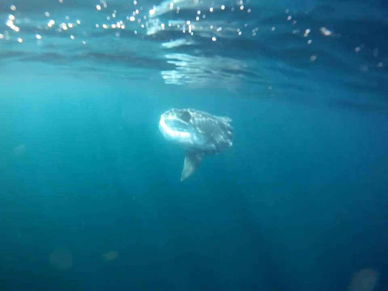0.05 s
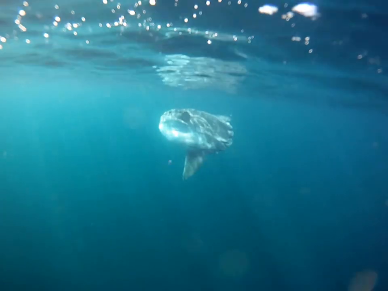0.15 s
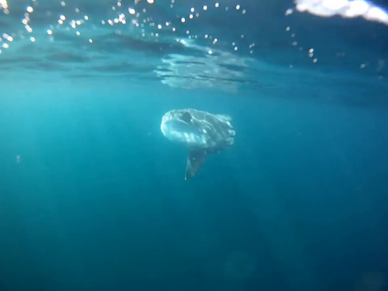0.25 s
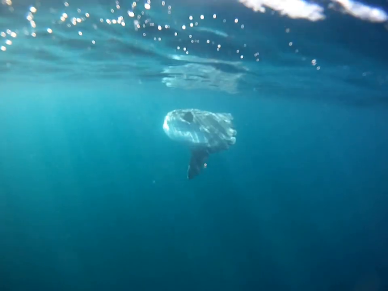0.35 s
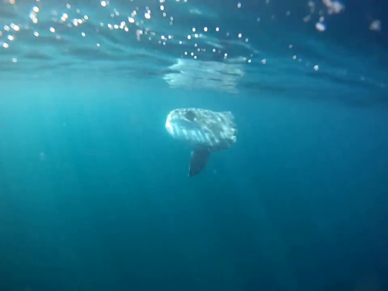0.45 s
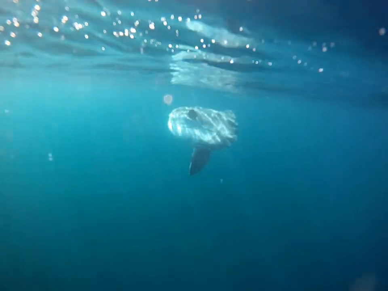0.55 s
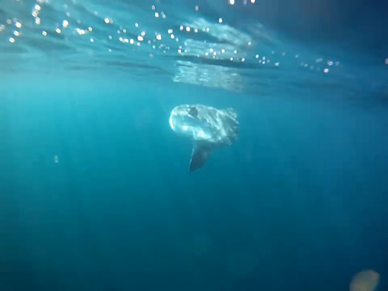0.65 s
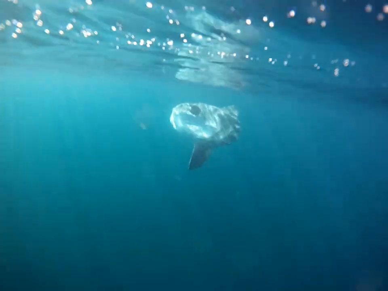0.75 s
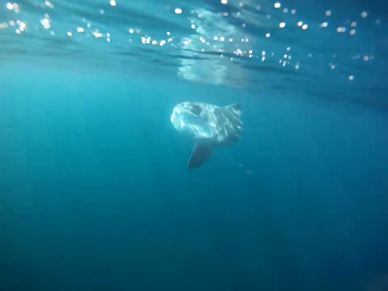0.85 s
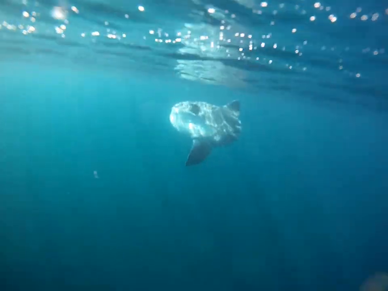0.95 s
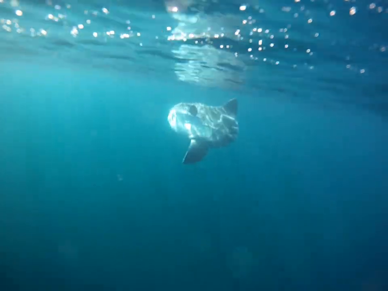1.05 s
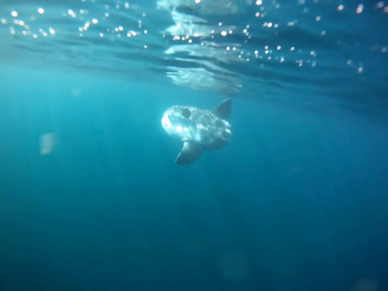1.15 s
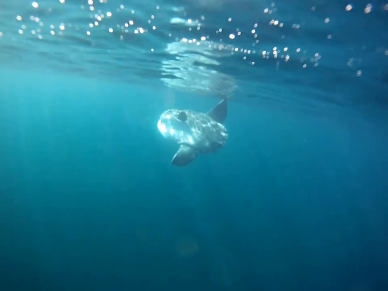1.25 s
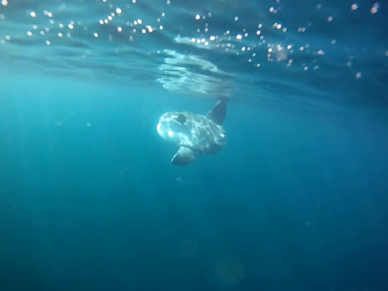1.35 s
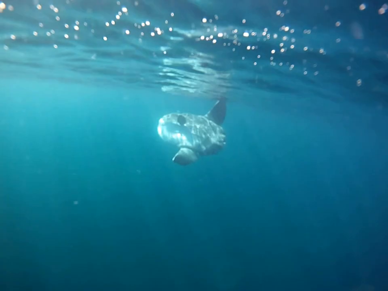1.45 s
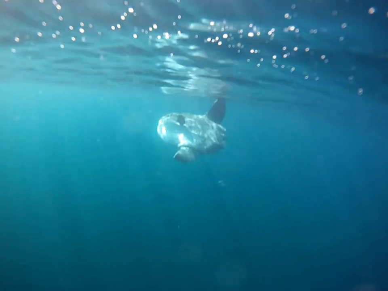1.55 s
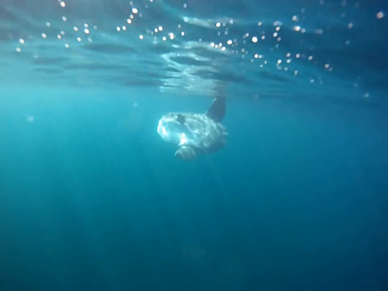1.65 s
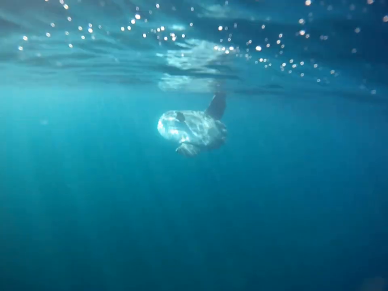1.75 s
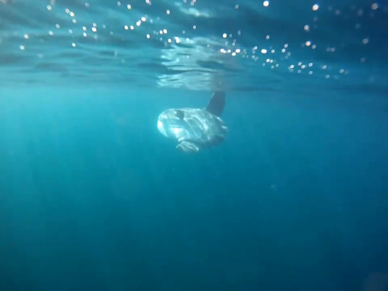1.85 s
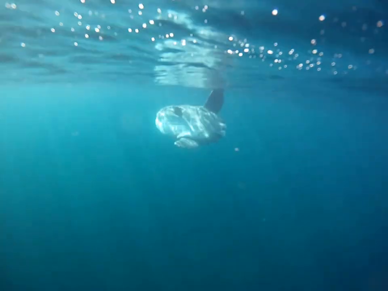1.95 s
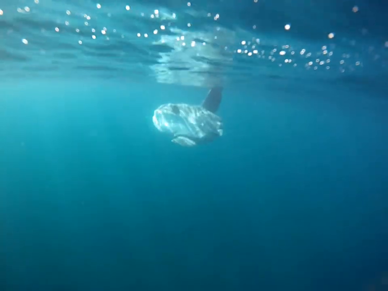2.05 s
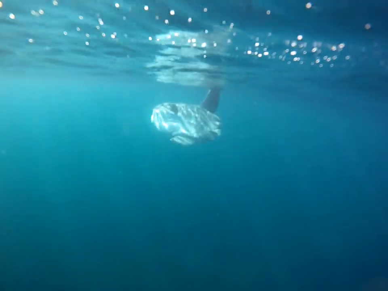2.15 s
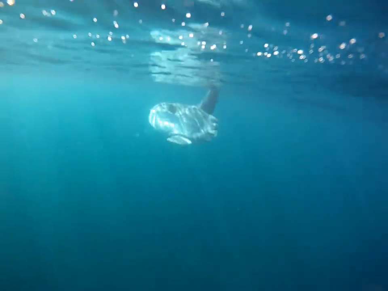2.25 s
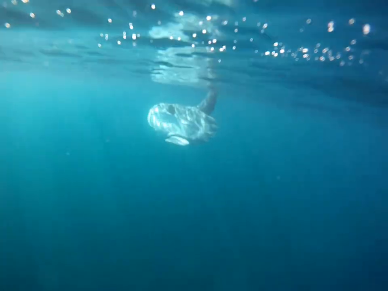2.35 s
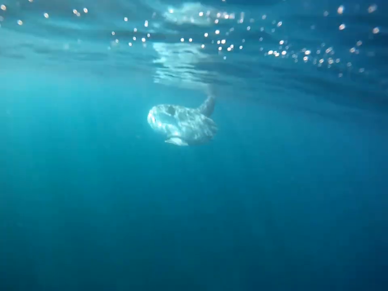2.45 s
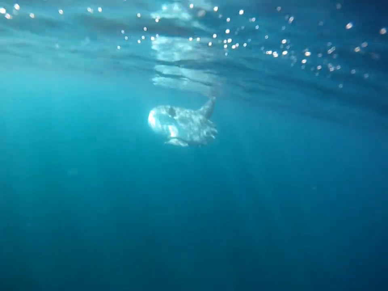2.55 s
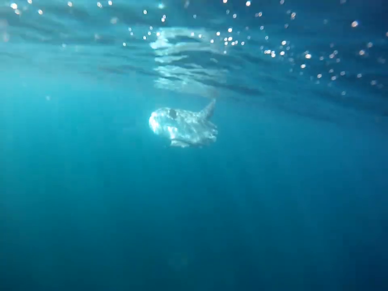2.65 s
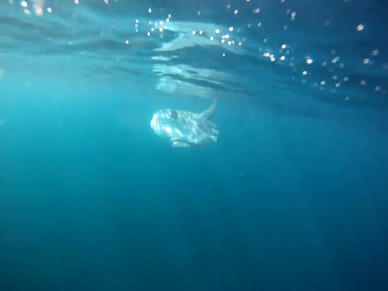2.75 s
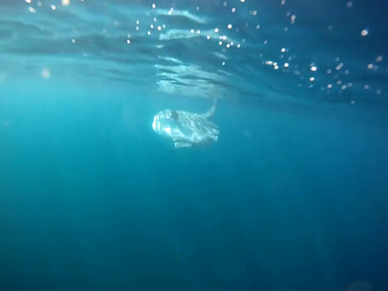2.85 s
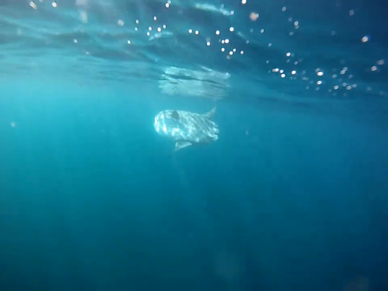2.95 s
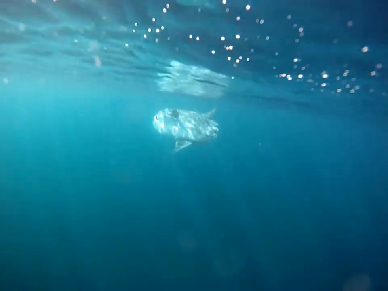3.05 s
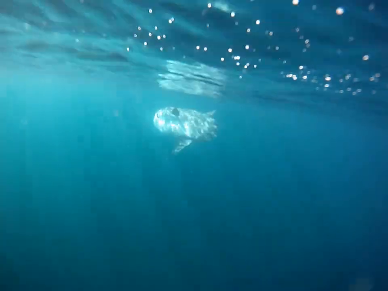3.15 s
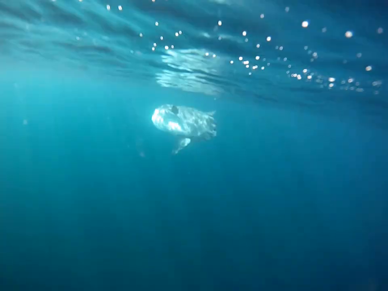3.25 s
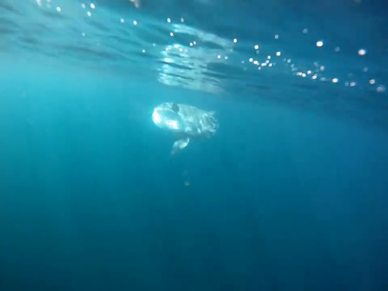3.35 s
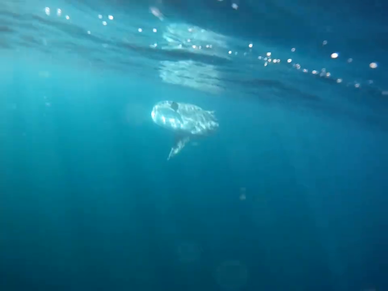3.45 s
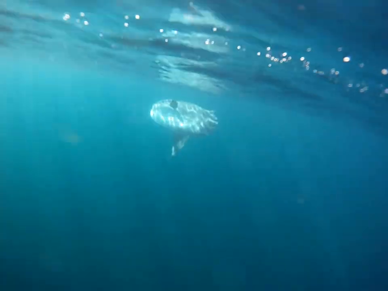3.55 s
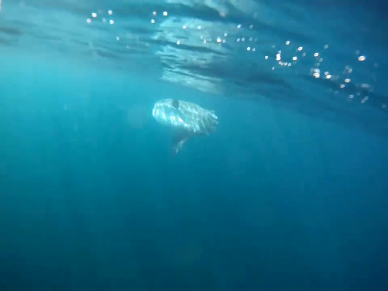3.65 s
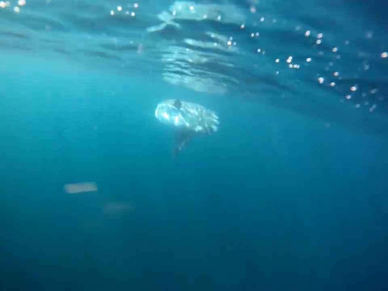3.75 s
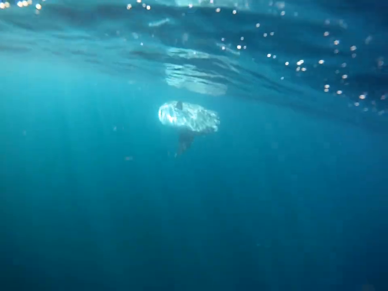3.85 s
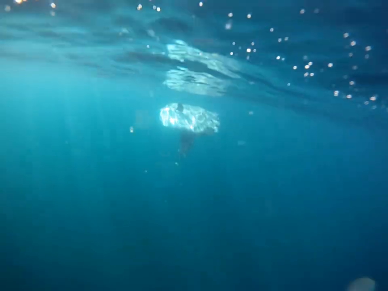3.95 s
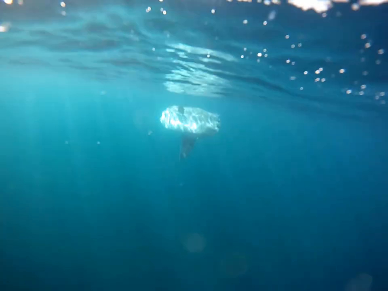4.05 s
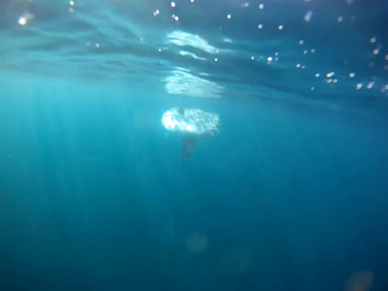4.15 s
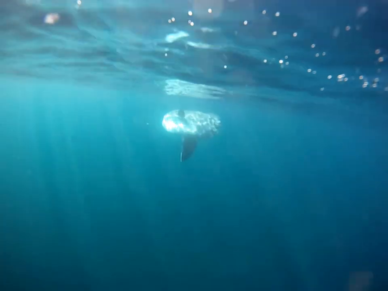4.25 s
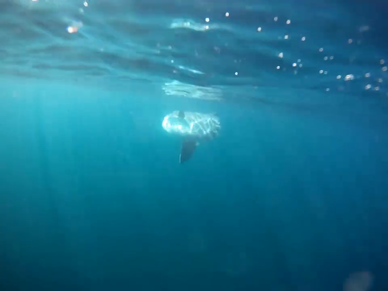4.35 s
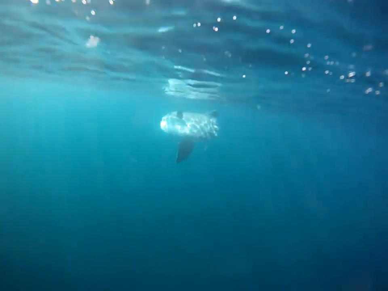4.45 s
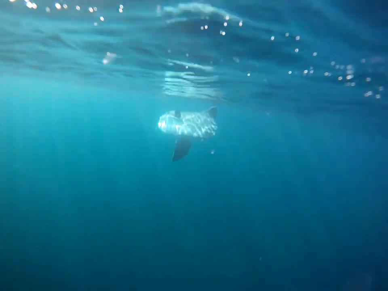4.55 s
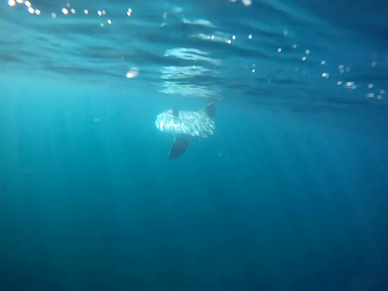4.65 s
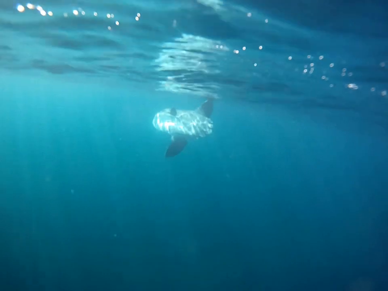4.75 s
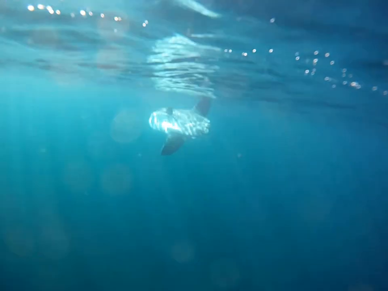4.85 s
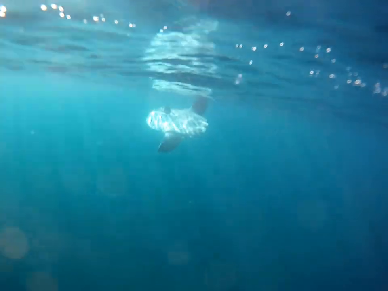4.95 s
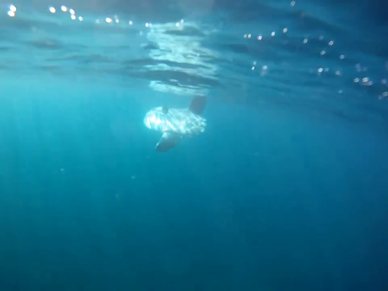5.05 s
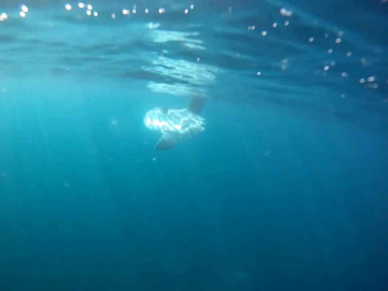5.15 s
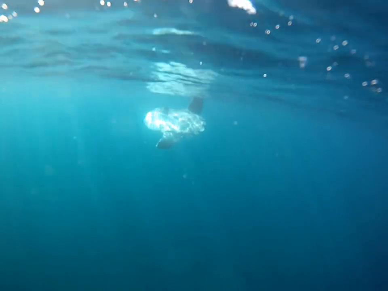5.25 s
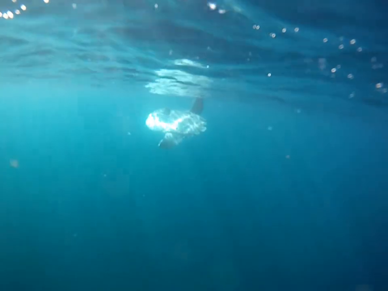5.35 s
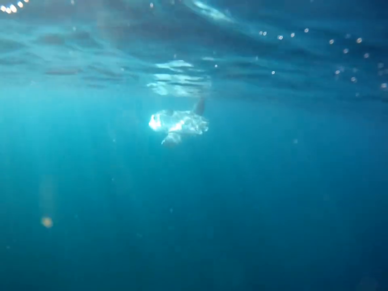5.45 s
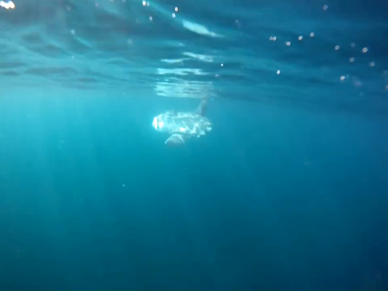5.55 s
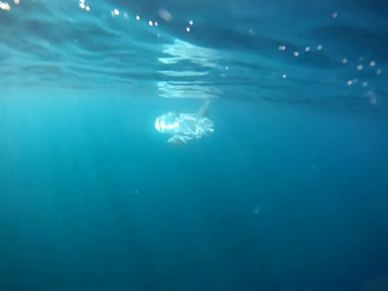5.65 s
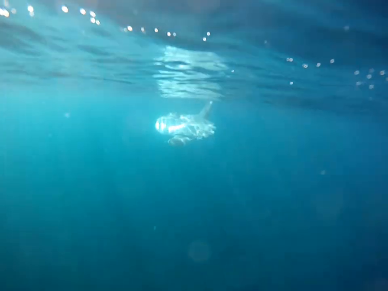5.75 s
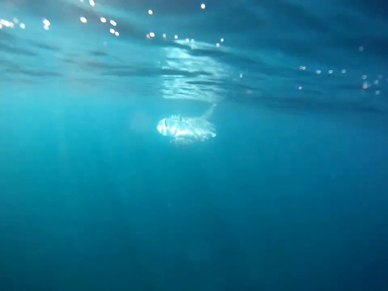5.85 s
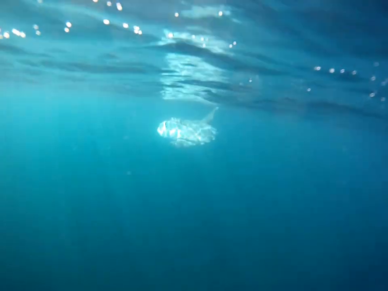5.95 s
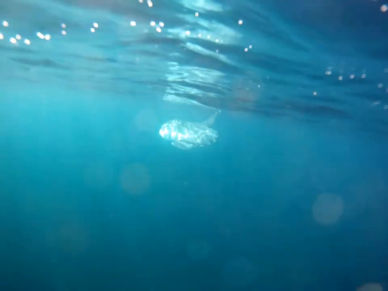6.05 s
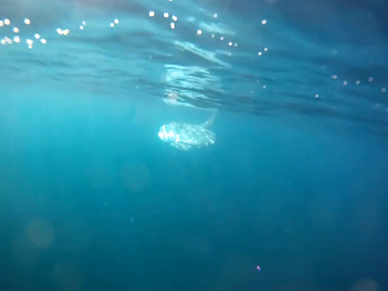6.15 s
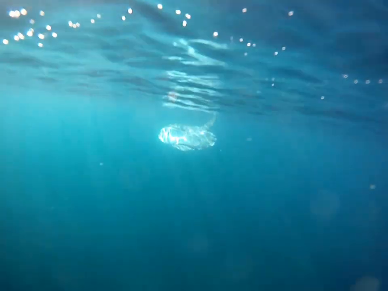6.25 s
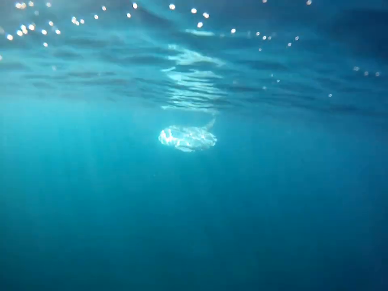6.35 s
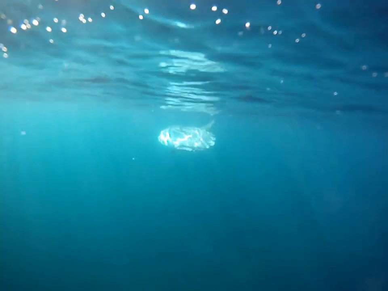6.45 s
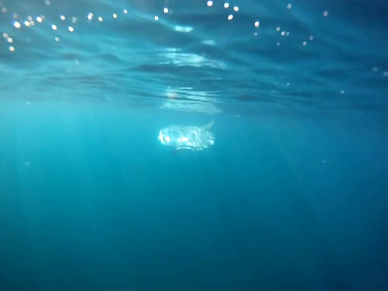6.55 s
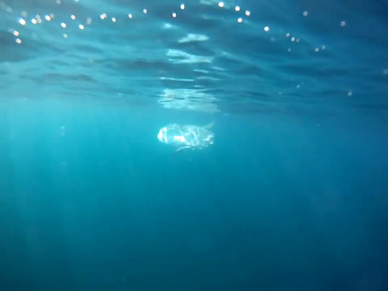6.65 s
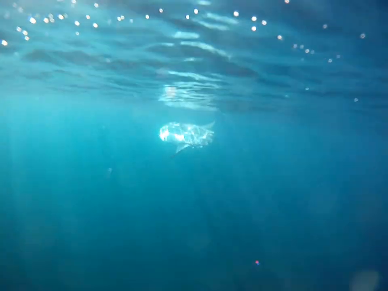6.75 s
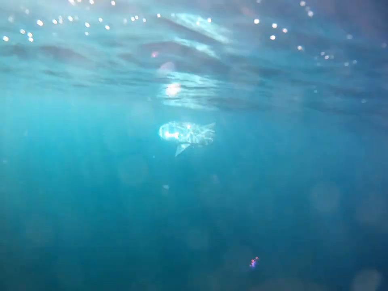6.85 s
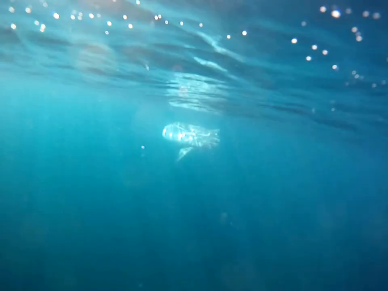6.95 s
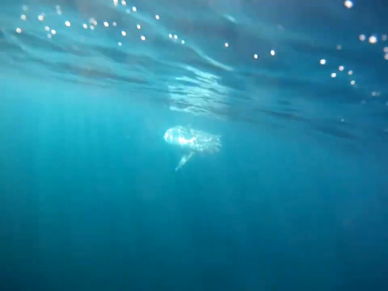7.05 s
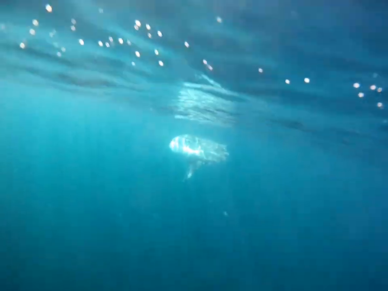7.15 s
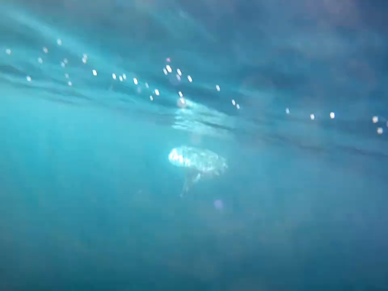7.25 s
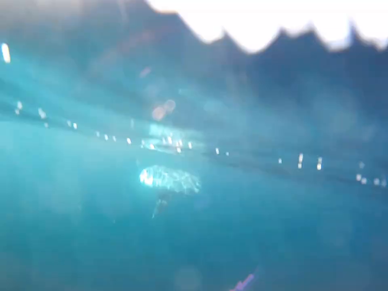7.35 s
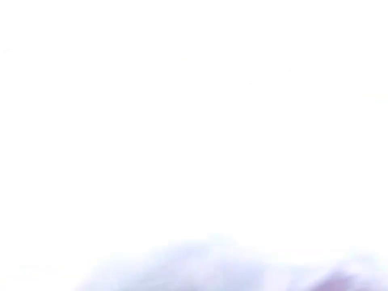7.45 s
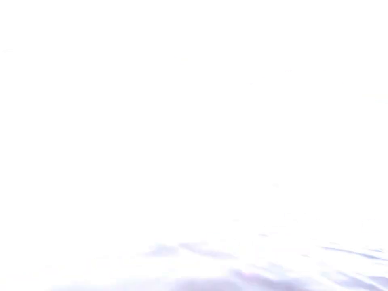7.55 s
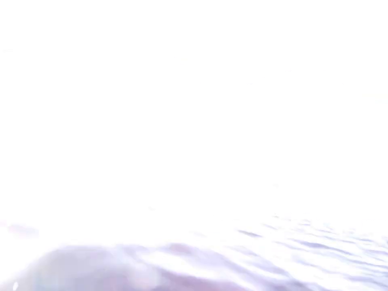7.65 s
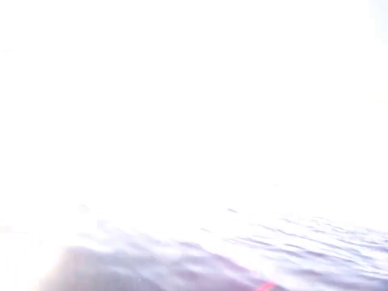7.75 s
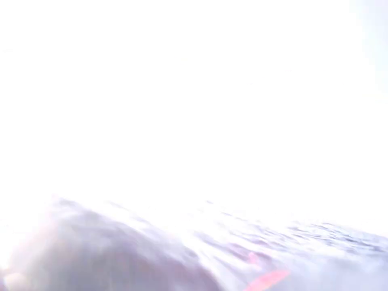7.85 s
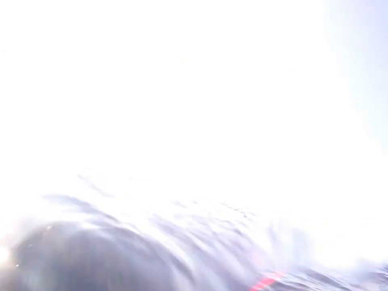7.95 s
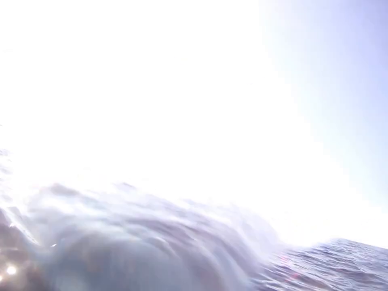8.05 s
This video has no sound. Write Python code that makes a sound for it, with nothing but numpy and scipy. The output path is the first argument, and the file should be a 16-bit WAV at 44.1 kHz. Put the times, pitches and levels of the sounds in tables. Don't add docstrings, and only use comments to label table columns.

```python
import sys
import numpy as np
from scipy import signal
from scipy.fft import rfft, irfft, next_fast_len
from scipy.io import wavfile
from scipy.ndimage import uniform_filter1d

SR = 44100
rng = np.random.default_rng(int(sys.argv[2]) if len(sys.argv) > 2 else 0)


def level_to_linear(level):
    exponent = np.asarray(level, float) / 20
    return 10 ** exponent


def wrap_up_sound(samples):
    columns = np.atleast_2d(samples).T
    tamed = np.clip(columns, -1, 1)
    steps = np.round(tamed * 32767).astype(np.int16)
    wavfile.write(sys.argv[1], SR, steps)


N = 356767


def rms_one(x):
    return x / np.sqrt(np.mean(x ** 2) + 1e-20)


def ramp(start_s, length_s):
    return np.clip((np.arange(N) / SR - start_s) / length_s, 0, 1)


def in_time(rows):
    s, *columns = np.transpose(rows)
    return [np.interp(np.arange(N) / SR, s, column) for column in columns]


def add(track, s, sound):
    i = round(s * SR)
    track[i:i + len(sound)] += sound[:N - i]


def drift(rate_hz):
    r = np.exp(-2 * np.pi * rate_hz * 40 / SR)
    chance = rng.standard_normal(N // 40 + 2002)
    slow = signal.lfilter([1], [1, -2 * r, r * r], chance)[2000:]
    return np.interp(np.arange(N) / 40, np.arange(len(slow)), rms_one(slow))


def resonate(x, hz, width_hz):
    r2 = np.exp(-2 * np.pi * width_hz / SR)
    top = np.array([1, 0, -1]) * (1 - r2) / 2
    return signal.lfilter(top, [1, -(1 + r2) * np.cos(2 * np.pi * hz / SR), r2], x)


def resonate_twice(x, hz, width_hz):
    return resonate(resonate(x, hz, width_hz), hz, width_hz)


def turbulence(modes, patchy_db, lumpy_db, rate_hz):
    white = rng.standard_normal((2, N + SR))
    lumps = drift(6.4 * rate_hz)
    out = 0
    for k, (hz, width_hz, level_db) in enumerate(modes):
        band = resonate_twice(white[k % 2], hz, 1.28 * width_hz)[SR:]
        out = out + level_to_linear(level_db + patchy_db * drift(rate_hz) + lumpy_db * lumps) * band
    return rms_one(out)


# time_s, push_db on hull and case, wash_db along the housing
SWELL = [(0, -46, -58), (.43, -40.5, -56), (.7, -42.5, -57.5), (1.08, -48.5, -59.5), (1.52, -41, -56),
         (2.03, -43, -56.5), (2.39, -48.5, -56.5), (2.8, -42.5, -51), (3.2, -43.5, -56), (3.62, -50, -57.5),
         (3.94, -45.5, -53.5), (4.24, -40.5, -52.5), (4.85, -47.5, -55.5), (5.3, -43, -54.5),
         (5.9, -44.5, -57.5), (6.4, -49, -56.5), (7.01, -43.5, -56.5), (7.16, -46, -55.5)]


def swell():
    push_db, wash_db = in_time(SWELL)
    last_crest = np.exp(-((np.arange(N) / SR - 7.97) / 0.06) ** 2)
    return push_db - 13.1 * ramp(7.45, 0.32) + 11 * last_crest, wash_db


# pitch_hz, width_hz, level_db
SURGE_TONES = [(17.5, 4.7, -1), (30, 6.1, -8), (40, 4, 0.5), (51.2, 17, -5), (63, 4.6, -20)]


def surge(push_db):
    level = level_to_linear(-52 + 1.33 * (push_db + 45)) + level_to_linear(-61)
    return level * turbulence(SURGE_TONES, patchy_db=0.9, lumpy_db=-0.2, rate_hz=1.8)


# pitch_hz, width_hz, level_db
HULL_TONES = [(80.5, 6.9, 0), (98, 12.5, 1.5), (120, 9.3, -1.5), (158.6, 25.6, -4.5), (178.1, 6, -5),
              (203.4, 20.6, -9), (229.6, 29.3, -6), (251.7, 11, -11), (275.3, 13.2, -13),
              (310, 56.4, -17.5), (380, 120, -25.5), (430, 50, -25), (553, 96, -26.5)]


def hull(push_db):
    return level_to_linear(push_db + 2.5) * turbulence(HULL_TONES, patchy_db=2.16, lumpy_db=1.54, rate_hz=6.4)


# pitch_hz, width_hz, level_db
HOUSING_TONES = [(490, 213, -4.5), (783, 81, -8), (900, 58, -5.5), (1300, 180, -6.5), (1463, 150, -4),
                 (1756, 250, -6.5), (2087, 240, 1), (2300, 43, 0.5), (2415, 180, -3), (2660, 226, -2)]


def housing(wash_db):
    wash_db = wash_db - 19.3 * ramp(7.17, 0.3)
    rings = turbulence(HOUSING_TONES, patchy_db=1.22, lumpy_db=0.4, rate_hz=6)
    low = signal.sosfiltfilt(signal.butter(2, 1200, fs=SR, output="sos"), rings)
    low_level = level_to_linear(-56.5 + 0.26 * (wash_db + 56))
    return level_to_linear(wash_db) * (rings - low) + low_level * low


# pitch_hz, width_hz, level_db
HISS_TONES = [(3540, 480, -1.5), (3820, 190, -2), (4200, 640, -2.5), (4764, 290, -2), (5300, 920, -2)]


def fine_hiss(wash_db):
    rise_db = 0.28 * (np.arange(N) / SR - 4)
    level_db = -66.5 + 0.64 * (wash_db + 56) + rise_db - 5.5 * ramp(7.18, 0.2)
    return level_to_linear(level_db) * turbulence(HISS_TONES, patchy_db=0.4, lumpy_db=0.66, rate_hz=5.7)


# start_s, peak_db, pitch_hz, t60_s (time to fall 60 dB)
KNOCK_TIMES = [(.384, -26, 163, 0.04), (.386, -28, 437, 0.018), (.59, -42, 325, 0.066),
               (1.89, -43, 310, 0.12), (5.755, -42.5, 409, 0.064), (.408, -31, 55.3, .06),
               (.55, -28.5, 101, 0.054), (1.764, -23.5, 95, 0.043), (1.9, -29.5, 113, 0.073),
               (2.716, -31.5, 41.5, 0.16), (3.02, -27, 47.4, 0.057), (5.122, -27, 45.3, 0.073),
               (5.762, -42, 109, 0.11), (7.003, -29, 45.3, 0.11), (7.058, -30.5, 48, 0.077),
               (7.745, -38, 40, 0.056), (7.85, -45.5, 30, 0.25), (7.98, -41, 70, 0.066),
               (7.946, -42, 261, 0.029), (7.874, -47, 90, 0.062), (8.0, -39.5, 120, 0.042),
               (7.82, -63, 640, 0.12), (.74, -43, 270, 0.067), (.76, -36.5, 140, .12), (1.72, -33, 150, .1),
               (2.62, -34, 100, 0.14), (2.86, -32.5, 98, .15)]


def knocks():
    out, t = np.zeros(N), np.arange(SR // 4) / SR
    for s, peak_db, hz, t60_s in KNOCK_TIMES:
        swing = np.sin(2 * np.pi * hz * t) * (1 - np.exp(-t / 0.0054))
        add(out, s, level_to_linear(peak_db + 9 - 60 * t / t60_s) * swing)
    return out


def pops(rows):
    out, ms = np.zeros(N), np.arange(2600) * 1000 / SR
    for s, peak_db, hz, swell_ms, t60_ms, glide in rows:
        swelling = 1 - np.exp(-(ms / swell_ms) ** 2)
        dying = level_to_linear(-60 * np.maximum(ms - 1.3 * swell_ms, 0) / t60_ms)
        cycles = hz * (ms + glide * ms ** 2 / 200) / 1000
        add(out, s, level_to_linear(peak_db) * swelling * dying * np.sin(2 * np.pi * cycles))
    return out


# start_s, peak_db, pitch_hz, t60_ms
CREAK_TIMES = [
    (1.14, -34, 800, 12),
    (1.142, -38, 1300, 12),
    (1.1704, -24.5, 1350, 17),
    (1.1703, -20, 5540, 15),
    (1.1711, -25.5, 1760, 6.6),
    (1.1705, -40, 3620, 20),
    (4.034, -41.5, 4160, 14),
    (4.599, -43, 2800, 18),
]


def creaks():
    return pops([(s, db, hz, 0.85, t60_ms, 0.3) for s, db, hz, t60_ms in CREAK_TIMES])


# start_s, peak_db, centre_hz, length_ms
WATER_DROPS = [(1.1706, -24.5, 2870, 0.89), (1.1703, -37, 700, 1.6), (4.034, -48, 4200, 1.5),
               (7.0592, -34, 1600, 2.4), (7.149, -36, 2800, 2.3), (7.231, -43, 5300, 2.5),
               (7.2865, -38.5, 3200, 1.8), (7.3169, -23, 3600, 1.1), (7.324, -36.5, 4000, 1.6),
               (7.356, -46, 4000, 1.5), (7.364, -44, 1500, 1.5), (7.3747, -31.5, 2200, 1.3),
               (7.386, -45, 3200, 3.5), (7.4382, -27, 3000, 1), (7.446, -19, 1900, 1.5),
               (7.477, -31, 1500, 1.5), (7.5165, -28.5, 3500, 2.7), (7.528, -31, 4500, 2.5),
               (7.539, -31, 4500, 3.3), (7.551, -31.5, 5450, 2.8), (7.5594, -25, 3500, 2.3),
               (7.5685, -18, 449, 1.5), (7.569, -29, 2480, 2.5), (7.581, -37.5, 1010, 9.5),
               (7.59, -30.5, 2200, 2.9), (7.597, -37, 4000, 1.8), (7.608, -35, 1210, 8.9),
               (7.6125, -33, 3600, 3.7), (7.6278, -14.5, 2800, 1.8), (7.637, -32, 2800, 2.7),
               (7.662, -38.5, 1300, 2.5), (7.669, -42, 2000, 2.2), (7.688, -46, 1400, 2.1),
                (7.706, -48, 1800, 2), (7.7162, -34, 4000, 1.8), (7.741, -44, 3000, 4.9),
                (7.7745, -38, 1940, 2.6), (7.794, -50, 2800, 1.6), (7.819, -36, 2480, 4.4),
                (7.852, -35, 3000, 1.7), (7.859, -35, 2300, 4), (7.893, -34.5, 1970, 1.4),
                (7.918, -39.5, 2000, 1.4), (7.942, -50, 5000, 1.8), (7.974, -38, 3570, 7.2),
                (7.984, -44.5, 2500, 3.7), (8.007, -48, 900, 1.8), (8.022, -41.5, 4500, 5.8),
                (8.055, -49.5, 5000, 2.5), (8.074, -51, 4000, 4.9)]
# pitch_hz, width_hz, level_db
CASE_TONES = [(1050, 300, 15), (2050, 540, 10), (2600, 350, -13.5), (3350, 240, -2), (4700, 129, -16.5),
              (5600, 440, 8.5)]


def drops():
    out, ms = np.zeros(N), np.arange(1300) * 1000 / SR
    for s, peak_db, hz, length_ms in WATER_DROPS:
        spread_hz = min(1.5 * hz, 3400)
        burst = rng.standard_normal(len(ms)) * (1 - np.exp(-ms / 0.29)) * np.exp(-ms / length_ms)
        spit = resonate(burst, hz, spread_hz)
        spit = resonate(spit, hz, 1.07 * spread_hz)
        rings = 0
        for case_hz, width_hz, level_db in CASE_TONES:
            luck_db = 1.8 * rng.standard_normal()
            rings = rings + level_to_linear(level_db + luck_db) * resonate(spit, case_hz, width_hz)
        spit = spit + rings
        add(out, s, level_to_linear(peak_db) * spit / np.abs(spit).max())
    return out


# start_s, peak_db, pitch_hz, swell_ms, t60_ms
SWOLLEN_POCKETS = [(1.715, -52, 900, 4.5, 40), (4.74, -53, 840, 4.5, 40), (7.4385, -26.5, 1980, 2.5, 24),
                   (7.52, -28.5, 1055, 1.1, 34), (7.534, -33, 1900, 1.2, 19), (7.568, 1.7, 1520, 3.3, 9),
                   (7.569, -19.5, 2900, 1.6, 11), (7.575, -11, 1934, 4.7, 17), (7.598, -18, 1222, 2.3, 22),
                   (7.6215, -31, 2150, 1.6, 22), (7.731, -40.5, 2150, 1.4, 15), (7.841, -42, 3350, 1.4, 11),
                   (7.926, -49, 2050, 1.6, 16)]


def swollen_pockets():
    return pops([(*row, 1.26) for row in SWOLLEN_POCKETS])


# start_s, level_db, hold_s, release_db_per_s
FOAM_GUSHES = [
    (7.052, -57.5, .058, 1900),
    (7.15, -65.5, 0.25, 300),
    (7.509, -46.5, 0.014, 200),
    (7.564, -40, .045, 261),
    (7.63, -53.5, .03, 259.5),
    (7.815, -70, .05, 200),
]
# pitch_hz, level_db
BUBBLE_COLOUR = [(700, -1), (1200, -4.5), (2100, 0.5), (3200, -7.5), (4300, -19), (5600, -22)]


def foam():
    t, attack_s = np.arange(N) / SR, 0.009
    level = level_to_linear(-68.5) * ramp(FOAM_GUSHES[0][0], attack_s)
    for s, level_db, hold_s, release_db in FOAM_GUSHES:
        fall_db = release_db * np.maximum(t - s - hold_s, 0)
        level = level + ramp(s, attack_s) * level_to_linear(level_db - fall_db)
    per_s = 2000 * np.maximum(level / level_to_linear(-62), 0.5) ** 0.4
    sizes = level_to_linear(4.6 * np.minimum(rng.exponential(1, N), 4)) * rng.choice([-1, 1], N) / np.sqrt(per_s)
    born = rng.random(N) < per_s * level_to_linear(3 * drift(60)) / SR
    pitches = np.geomspace(750, 5600, 18)
    dealt = rng.integers(0, 18, N)
    colour_hz, colour_db = np.transpose(BUBBLE_COLOUR)
    colour = level_to_linear(np.interp(np.log(pitches), np.log(colour_hz), colour_db))
    rings = 0
    for k, hz in enumerate(pitches):
        bursts = sizes * born * (dealt == k) + 1e-18
        rings = rings + colour[k] * resonate(bursts, hz, 0.13 * hz)
    return level * rms_one(rings)


def puff():
    start_s, length_s, edge_s = 7.06, 0.05, 0.006
    hiss = resonate_twice(rng.standard_normal(N), 2300, 2600)
    return level_to_linear(-50.5) * rms_one(hiss) * (ramp(start_s, edge_s) - ramp(start_s + length_s, edge_s))


# start_s, peak_db
SNAP_TIMES = [
    (7.1493, -45),
    (7.2865, -48),
    (7.3173, -24.5),
    (7.3746, -23.5),
]
# pitch_hz, level_db, swell_ms, t60_ms, glide in % per ms
FILM_TONES = [(580, -1, 0.8, 12, .5), (1200, -7, 1.3, 29, -0.076), (1880, 0.7, 0.75, 8, -2.6)]


def snaps():
    rows = [(s, db + tone_db, hz, *shape) for s, db in SNAP_TIMES for hz, tone_db, *shape in FILM_TONES]
    return pops(rows)


# start_s, peak_db, pitch_hz, t60_ms, glide in % per ms
STRUCK_POCKETS = [(7.446, -6.5, 1682, 20, -1), (7.4475, -22.5, 1200, 13, -1), (7.4838, -19.5, 936, 32, 0.3),
                  (7.5138, -22.5, 1730, 4.9, -2), (7.5684, -6, 1373, 10, 6), (7.589, -20, 1700, 11, -3.5),
                  (7.6112, -21, 2500, 14, 0.5), (7.628, -25, 2396, 42, 0.4), (7.637, -29, 1640, 20, -2),
                  (7.6148, -26.5, 4550, 14, 7), (7.654, -38, 4650, 13, -2), (7.897, -40.5, 2050, 24, .3),
                  (8.0192, -19.5, 1990, 9.3, 2.5), (8.028, -34.5, 2250, 20, 0)]


def struck_pockets():
    return pops([(s, db, hz, 0.44, t60_ms, glide) for s, db, hz, t60_ms, glide in STRUCK_POCKETS])


# start_s, peak_db
SLAP_TIMES = [
    (7.478, -9),
    (7.4836, -10),
]


def slaps():
    out, ms = np.zeros(N), np.arange(-220, 220) * 1000 / SR
    for s, peak_db in SLAP_TIMES:
        add(out, s - 220 / SR, level_to_linear(peak_db) * np.exp(np.where(ms < 0, ms / 1.3, -ms / 0.45)))
    return signal.sosfilt(signal.butter(2, [90, 1600], "band", fs=SR, output="sos"), out + 1e-18)


def scene():
    push_db, wash_db = swell()
    sea = surge(push_db) + hull(push_db) + housing(wash_db) + fine_hiss(wash_db)
    case = knocks() + creaks() + drops()
    surfacing = swollen_pockets() + foam() + puff() + snaps() + struck_pockets() + slaps()
    return (sea + case + surfacing)[None]


def band_limit(x):
    return signal.sosfilt(signal.butter(12, 16470, fs=SR, output="sos"), x)


# low_hz, high_hz, threshold_db
GATED_BANDS = [(12800, 13250, -92), (15040, 15340, -87), (15340, 15850, -73), (15850, 16400, -63)]


def record(dry):
    sample_hz = 12000
    dry = dry / (1 + dry ** 6) ** (1 / 6)
    guard = signal.butter(8, 5650, fs=SR, output="sos")
    slow = signal.resample_poly(signal.sosfiltfilt(guard, dry), sample_hz // 300, SR // 300, axis=1)
    steps = np.repeat(slow, 4, axis=1)
    held = signal.resample_poly(steps, SR // 300, 4 * sample_hz // 300, axis=1)[:, :N]
    size = next_fast_len(N)
    spectrum, hz = rfft(held, size), np.arange(size // 2 + 1) * SR / size
    out = irfft(spectrum * (hz < GATED_BANDS[-1][1]), size)[:, :N]
    for low_hz, high_hz, threshold_db in GATED_BANDS:
        band = irfft(spectrum * (hz >= low_hz) * (hz < high_hz), size)[:, :N]
        shut = uniform_filter1d(band ** 2, size=1024) < level_to_linear(2 * threshold_db)
        out = out - band * uniform_filter1d(uniform_filter1d(shut * 1., size=400), size=400)
    return band_limit(out)


dry = scene()
out = record(dry)
wrap_up_sound(out)
```